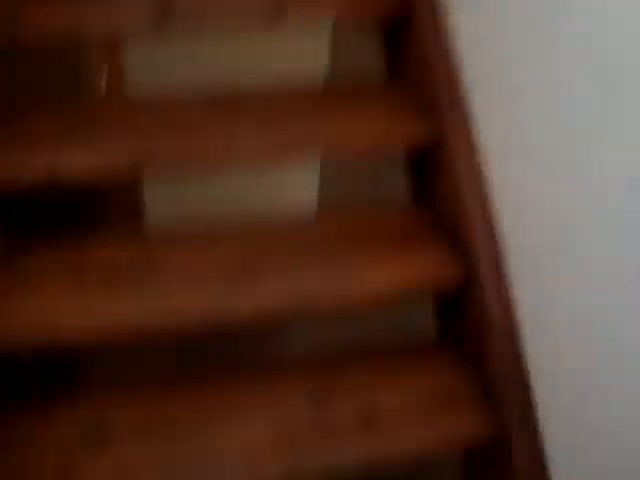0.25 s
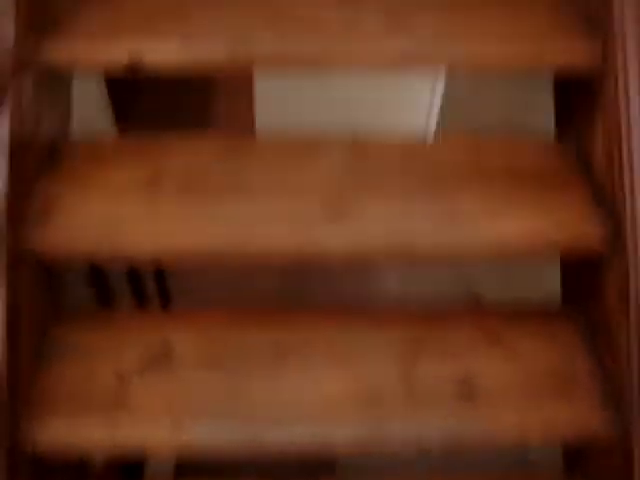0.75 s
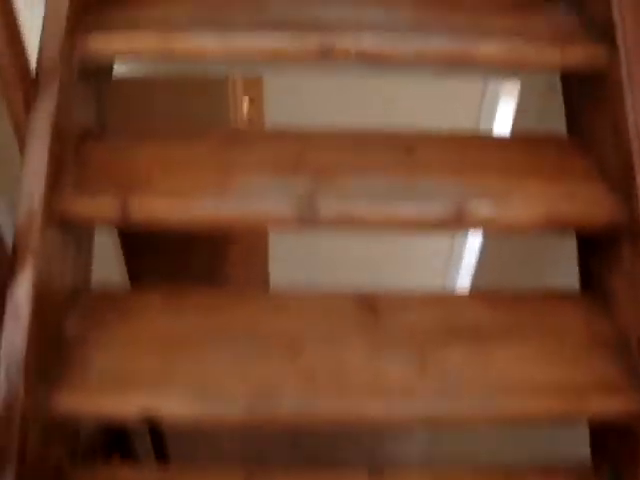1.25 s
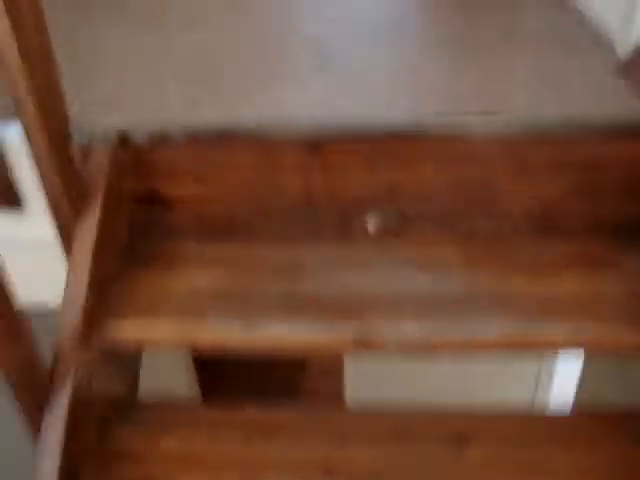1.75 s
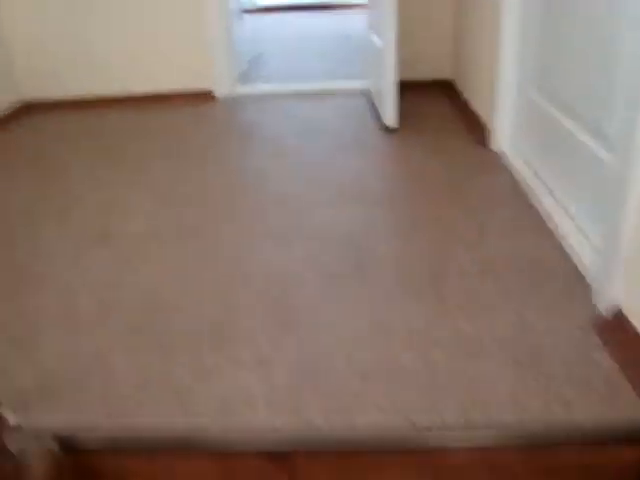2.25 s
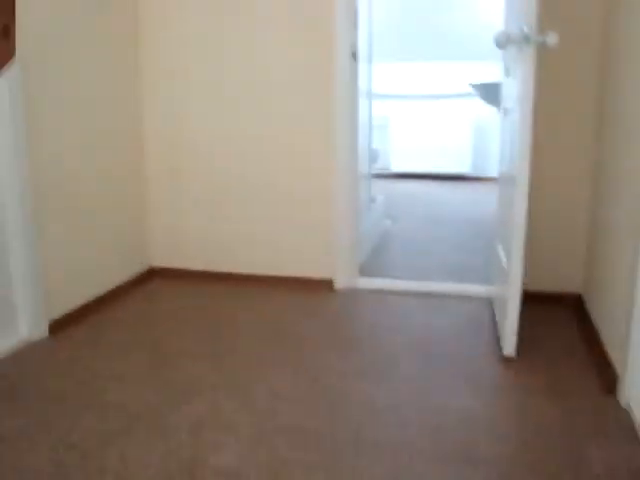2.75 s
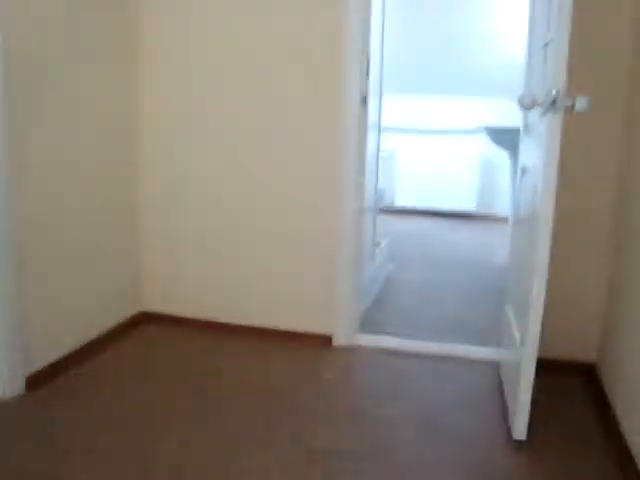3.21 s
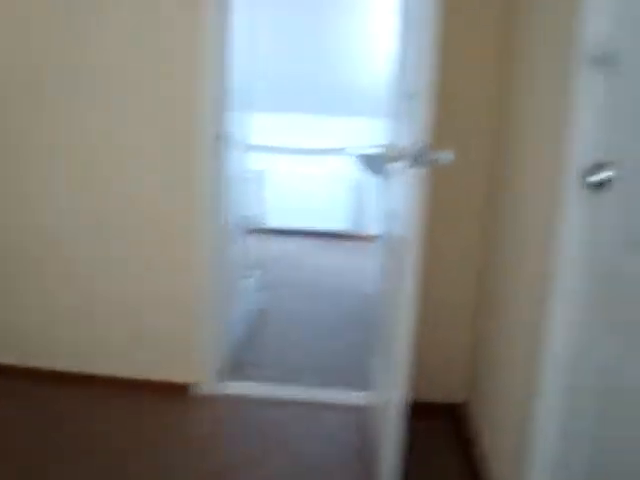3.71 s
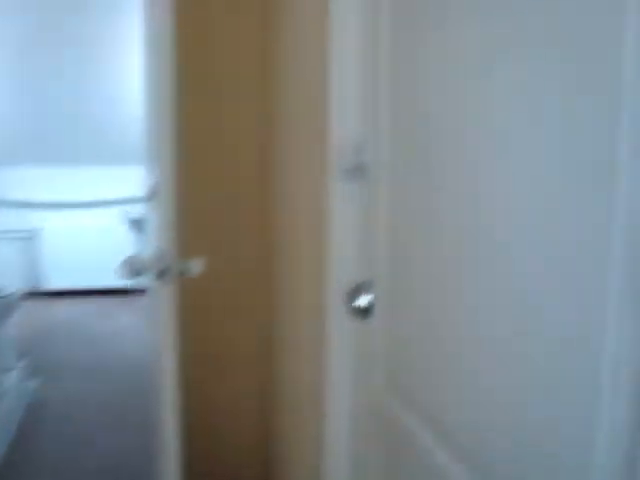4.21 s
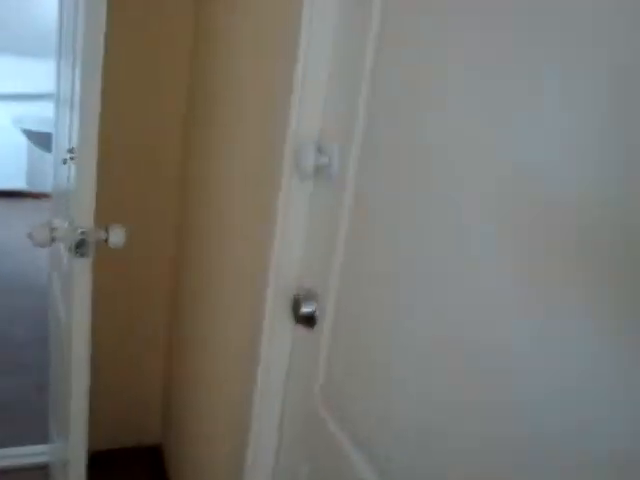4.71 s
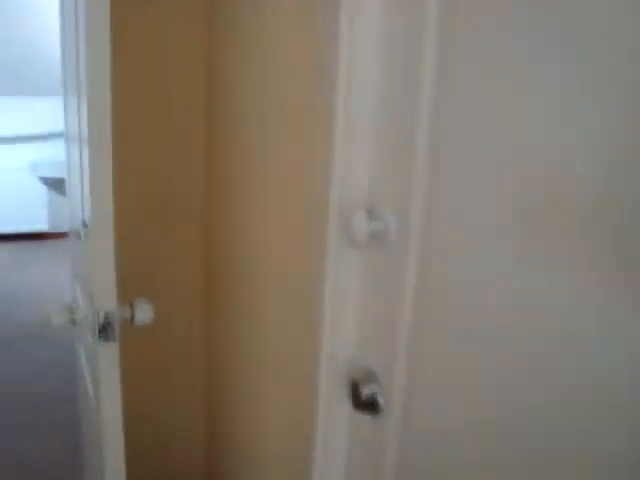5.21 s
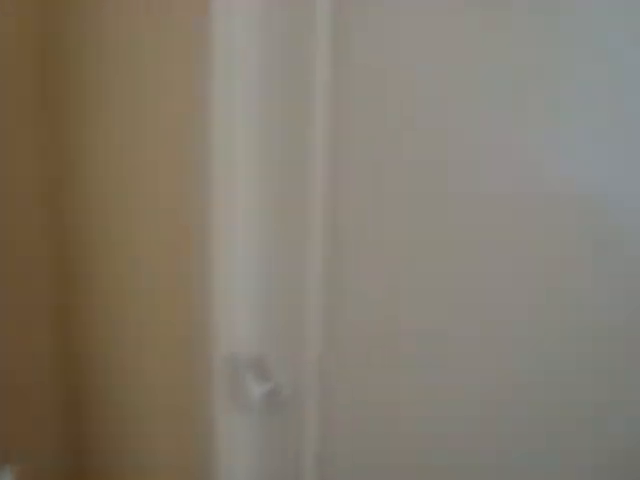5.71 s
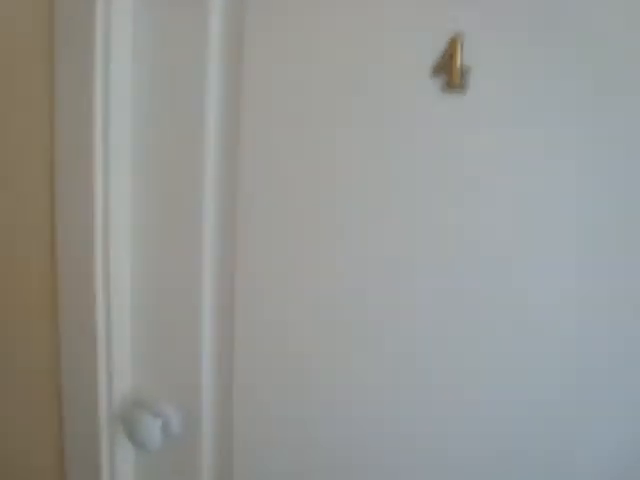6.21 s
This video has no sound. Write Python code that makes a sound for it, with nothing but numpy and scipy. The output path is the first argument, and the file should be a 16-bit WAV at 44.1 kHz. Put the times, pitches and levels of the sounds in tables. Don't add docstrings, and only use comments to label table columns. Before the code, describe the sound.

Hard heels climb wooden stairs and cross a bare landing, nine separate knocks ringing through an echoing empty house over faint hiss and hum.

```python
import sys
import numpy as np
from scipy import signal
from scipy.io import wavfile
from scipy.ndimage import uniform_filter1d

SR = 44100
rng = np.random.default_rng(int(sys.argv[2]) if len(sys.argv) > 2 else 0)


def rack_gain(trim_db):
    fader = np.asarray(trim_db, float)
    return 10 ** (fader / 20)


def inscribe(sig):
    pcm = np.round(np.clip(np.atleast_2d(sig).T, -1, 1) * 32767)
    wavfile.write(sys.argv[1], SR, pcm.astype(np.int16))


N = 284886


def heels():
    # start_s, peak_db, knock_hz, room_db (re peak), bright_db (per octave above 1 kHz)
    strikes = [
        (0.5873, -20, 1160, -13, -2),
        (1.4146, -11, 1540, -15, 0),
        (1.9888, -13, 1420, -15.5, -1.5),
        (2.5351, -20, 910, -12.5, 1),
        (3.0968, -19, 1410, -17.5, 0.9),
        (3.7275, -24, 920, -10.5, 1.5),
        (4.3482, -18, 1740, -14.5, 0),
        (5.0792, -18, 2430, -11.5, 4),
        (6.3399, -26.5, 1900, -11, 5.5),
    ]
    # mode_hz, level_db (above the shared wood colour)
    board_modes = [
        [(300, 5.5), (460, 10), (750, 3.5), (1050, 5.5), (2000, 4)],
        [(150, -12), (480, 3), (1100, 6.5), (1750, 2.5), (2600, 1.5), (3300, 5), (4700, 7.5)],
        [(437, 3), (800, -2), (1150, 6), (1540, 8)],
        [(480, 12), (680, -0.5), (1000, 7), (3000, 4)],
        [(445, 5), (850, -0.5), (1600, 4)],
        [(400, 8.5), (580, 7), (850, 8), (1200, 6), (2050, 1)],
        [(120, -4), (205, 11), (560, 9.5), (820, -2), (1200, 6.5), (1480, -2.5), (1800, 11), (2200, -2),
         (3300, 0.5)],
        [(180, 2), (300, 15), (550, 3.5), (800, 4.5), (1350, 3), (2500, 4.5), (3150, 5.5), (4350, 9.5),
         (5000, 3), (6100, 7)],
        [(280, 4.5), (600, 1), (1100, -7), (1900, 0), (5300, 1)],
    ]
    width_hz = 720
    out = np.zeros(N)
    for strike, modes, spot in zip(strikes, board_modes, spots()):
        s, db, hz, room_db, bright_db = strike
        ring = push_response(board(modes, bright_db))
        direct = knock(hz, width_hz)
        soft_ring = np.convolve(ring / abs(ring).max(), np.hanning(9) / 4)
        add(out, s, rack_gain(db) * direct)
        add(out, s + 0.00218, rack_gain(db - 5.5) * direct)
        add(out, s, rack_gain(db - 8.5) * soft_ring)
        add(out, s, rack_gain(db + room_db) * room(ring, 0.97, spot))
    return out


def board(modes, bright_db):
    # freq_hz, level_db (per Hz)
    wood = [(70, -48), (130, -17.5), (300, -15.5), (500, -7.5), (1200, -6), (2500, -13), (4500, -29.5),
            (9000, -48)]
    mode_octaves, sharpening = 0.17, 0.46
    hz = np.geomspace(60, 16000, num=160)
    humps = np.zeros(len(hz))
    for mode_hz, db in modes:
        distance = np.log2(hz / mode_hz) / mode_octaves * (mode_hz / 1000) ** sharpening
        humps += db * np.exp(-distance ** 2)
    tilt = bright_db * np.maximum(np.log2(hz / 1000), 0)
    return np.transpose([hz, read(wood, hz) + humps + tilt])


def push_response(points):
    hz = abs(np.fft.fftfreq(4096, 1 / SR))
    log_gain = np.log(rack_gain(np.maximum(read(points, hz), -70)))
    return np.fft.ifft(np.exp(np.conj(signal.hilbert(log_gain)))).real[:2048]


def knock(hz, width):
    u = np.clip(np.arange(1024) / SR * hz / 0.68, 0, 1)
    push = np.sin(np.pi * u) ** 2
    swing = resonate(resonate(push, hz, width), hz, width)
    return swing / abs(swing).max()


def taps():
    # start_s, peak_db, centre_hz, width_hz, room_db (re peak)
    soles = [(.098, -45, 1500, 1530, -11.5), (.145, -41.5, 690, 500, -10.5),
             (0.6178, -26.5, 1190, 1110, -11.5), (1.438, -23, 1080, 400, -21),
             (2.555, -27.5, 495, 300, -14), (2.906, -44.5, 600, 500, -11.5),
             (3.121, -31.5, 1140, 800, -8.5), (3.585, -42.5, 1300, 300, -25),
             (3.750, -28.5, 1060, 500, -12.5), (4.359, -22, 1150, 600, -20), (5.094, -25.5, 1450, 400, -14),
             (5.791, -44, 900, 2200, -6.5), (5.947, -35.5, 895, 1300, -12), (6.391, -41.5, 1480, 2400, -2),
             (6.385, -45, 430, 600, -1)]
    # start_s,
    # peak_db, centre_hz, width_hz, room_db (re peak)
    ticks = [(.152, -37, 3800, 2200, -26), (.630, -31, 3050, 800, -18), (.8093, -18, 3600, 4000, -40),
             (.8108, -26, 3800, 1100, -36), (.8115, -31, 1700, 900, -30), (5.0788, -25, 1300, 1200, -22),
             (1.2583, -32, 1700, 2000, -16), (4.1046, -32, 2400, 6000, -30), (5.0800, -29, 4300, 900, -13),
             (5.0790, -31, 6050, 900, -13), (6.3460, -23, 2300, 2400, -20)]
    rows = [(*sole, 0.71) for sole in soles]
    for tick in ticks:
        stretch = max(0.91 - 0.03 * tick[-1], .2)
        rows.append((*tick, stretch))
    out = np.zeros(N)
    for (s, db, hz, width, room_db, stretch), spot in zip(rows, spots()):
        tap = knock(hz, width)
        add(out, s, rack_gain(db) * tap)
        add(out, s, rack_gain(db + room_db) * room(tap, stretch, spot))
    return out


def scuffs():
    # start_s, rms_db, length_s, centre_hz, room_db
    slides = [(0.62, -50.5, 0.041, 4470, -27), (0.744, -58, 0.033, 7000, -20),
              (1.255, -53.5, 0.076, 2400, -2), (1.43, -34.5, 0.0062, 6400, 1),
              (1.51, -51.5, 0.031, 4500, 11), (1.991, -55, .04, 7000, -9), (2.14, -56, 0.07, 6900, -10),
              (2.57, -65, .033, 5025, 4), (3.126, -49, 0.05, 4300, 0), (4.357, -58, .13, 4370, -2),
              (5.064, -49.5, 0.048, 6240, 2.5), (5.288, -52, .05, 3000, -3), (5.848, -51, .025, 4300, 6.5),
              (5.955, -57, .053, 7240, 7), (6.365, -68, 0.1, 7500, 4), (5.789, -50, 0.26, 1680, -8),
              (0.098, -59, 0.11, 1970, -14)]
    # start_s, rms_db, length_s
    swings = [
        (0.647, -52, 0.15),
        (2.433, -64, .24),
        (2.879, -64, 0.31),
        (4.546, -59.5, .24),
        (6.199, -59, 0.25),
    ]
    out = np.zeros(N)
    grits = rng.standard_normal((30, 16384)) * rack_gain(1.5 * rng.exponential(1, (30, 16384)))
    rows = [(s, db, length, hz, 2100 + 0.22 * hz, wet) for s, db, length, hz, wet in slides]
    rows += [(*swing, 3820, 1000, -2) for swing in swings]
    for (s, db, length, hz, width, room_db), grit, spot in zip(rows, grits, spots()):
        u = np.arange(16384) / SR / length
        swell = 3 * u * np.exp(1 - 3 * u)
        rub = evened(resonate(resonate(grit, hz, width), hz, 2 * width)) * swell
        add(out, s, rack_gain(db) * rub)
        add(out, s, rack_gain(db + room_db - 13.0) * room(rub, 0.65, spot))
    return out


def thuds():
    # start_s, peak_db, centre_hz, t60_s
    sinks = [(0.599, -51, 130, 0.55), (0.917, -38, 70.5, 0.15), (1.43, -53, 110, .25),
             (1.999, -43.5, 100, 0.14), (2.562, -35.5, 116, 0.27), (3.11, -49, 117, 0.29),
             (3.74, -56, 114, 0.4), (4.358, -44, 200, 0.25), (5.093, -35, 95, 0.24),
             (6.381, -47, 111, 0.22), (.0, -52, 120, 0.26), (.84, -49, 163, 0.38), (1.78, -58, 121, 0.33),
             (4.051, -50, 140, 0.17), (5.87, -62, 140, 0.59)]
    out, t = np.zeros(N), np.arange(SR // 2) / SR
    for (s, db, hz, t60), shake in zip(sinks, rng.standard_normal((len(sinks), SR // 2))):
        body = evened(resonate(resonate(shake, hz, 0.66 * hz), hz, 0.66 * hz))
        swell = 1 - np.exp(-t / 0.052)
        add(out, s, rack_gain(db - 60 * t / t60) * swell * body)
    return out


def house_and_microphone():
    # freq_hz, level_db (per Hz)
    colour = [(15, -47), (25, -32), (59, -2.5), (81, -11.5), (292, -2.5), (384, 1.5), (414, -0.5),
              (836, -1), (1310, -4.5), (1420, -5), (1530, -6), (1870, -10.5), (3960, -13), (10000, -20.5),
              (13000, -90), (22000, -120)]
    # time_s, level_db
    hum_levels = [
        (0, -56),
        (.4, -56.5),
        (1.2, -58),
        (2.4, -57.5),
        (3.6, -55.5),
        (4.2, -57.5),
        (4.9, -56.5),
        (5.6, -57),
        (6.1, -56.5),
        (6.46, -59),
    ]
    rumble_db, hiss_db = -72, -57.5
    frames, hz = N // 256 + 5, np.fft.rfftfreq(1024, 1 / SR)[:, None]
    a, b, patches = rng.standard_normal((frames, 513, 3)).T
    patches = evened(uniform_filter1d(uniform_filter1d(patches, 10, 0), 12, 1))
    z = (a + 1j * b) * rack_gain(read(colour, hz) + .7 * patches)
    low = 1 / (1 + (hz / 200) ** 4)
    high = 1 / (1 + (2000 / (hz + 1)) ** 4)
    middle = np.maximum(1 - low - high, 0)
    layers = []
    for share in (low, middle, high):
        layer = signal.istft(z * np.sqrt(share), nperseg=1024, noverlap=768)[1][:N]
        layers.append(evened(layer))
    rumble, hum, hiss = layers
    s, level_db = np.transpose(hum_levels)
    hum_db = np.interp(np.arange(N) / SR, s, level_db)
    return rack_gain(rumble_db) * rumble + rack_gain(hum_db) * hum + rack_gain(hiss_db) * hiss


def room(source, stretch, chance):
    # freq_hz, t60_s
    decay = [(100, 0.79), (260, 0.6), (700, 0.78), (1840, 0.6), (4000, 0.63), (9000, 0.75)]
    t = np.arange(len(chance)) / SR
    per_s = np.clip(2200 + 60000 * t, 300, 4000)
    echoes = (abs(chance) < per_s / SR) * np.sign(chance) / np.sqrt(per_s) * (t > .003)
    echoes *= 1 + .5 * np.exp(-t / 0.0049)
    hz, frames, z = signal.stft(echoes, SR, nperseg=256)
    fade = rack_gain(-60 * frames / (stretch * read(decay, hz)[:, None]))
    tail = signal.istft(z * fade, SR, nperseg=256)[1]
    wet = signal.fftconvolve(source, tail)[:len(chance)]
    return wet / np.sqrt(np.mean(wet[:2048] ** 2))


def spots():
    return rng.uniform(-1, 1, (26, 28672))


def resonate(x, hz, width):
    b, a = signal.iirpeak(hz, hz / np.clip(width, 20, 12000), SR)
    return signal.lfilter(b, a, x)


def evened(x):
    return x / np.sqrt(np.mean(x ** 2) + 1e-20)


def read(points, hz):
    f, value = np.transpose(points)
    return np.interp(np.log(hz + 1), np.log(f + 1), value)


def add(mix, s, sound):
    part = mix[round(s * SR):][:len(sound)]
    part += sound[:len(part)]


def scene():
    return (thuds() + house_and_microphone() + heels() + taps() + scuffs())[None]


def roll_off(x):
    return signal.sosfilt(signal.butter(12, 10160, fs=SR, output="sos"), x)


def record(dry):
    return roll_off(dry)


dry = scene()
out = record(dry)
inscribe(out)
```